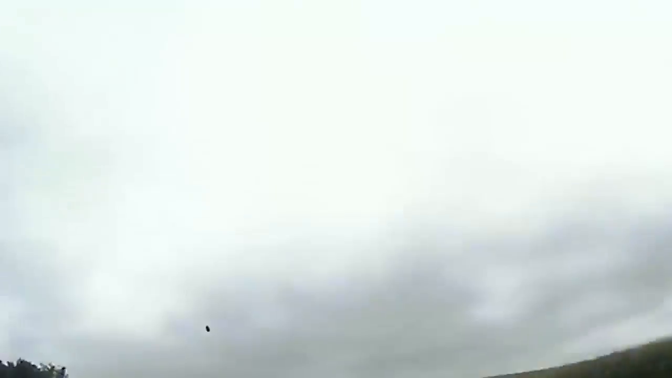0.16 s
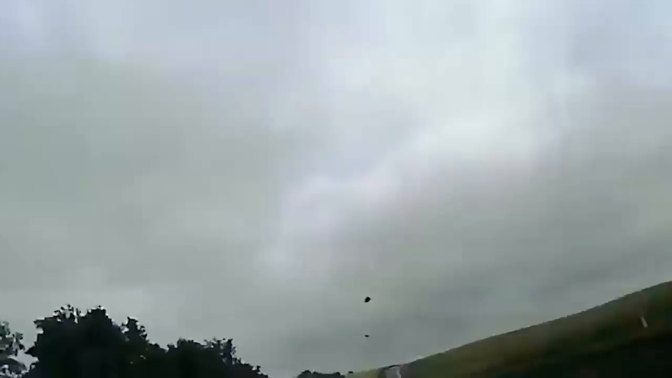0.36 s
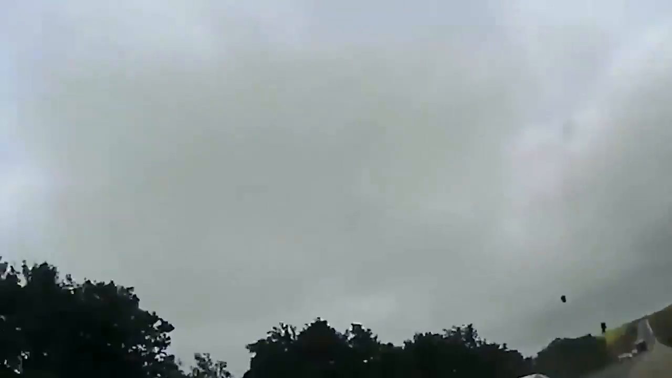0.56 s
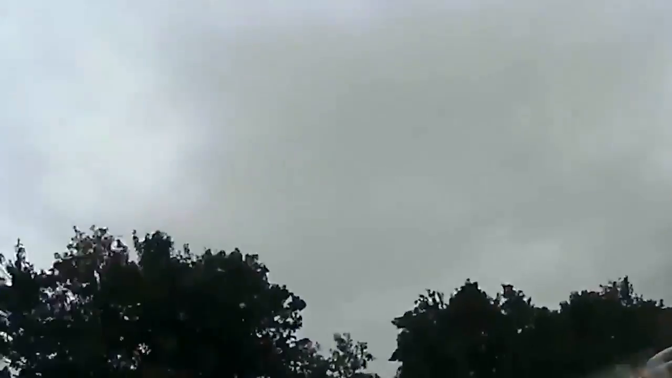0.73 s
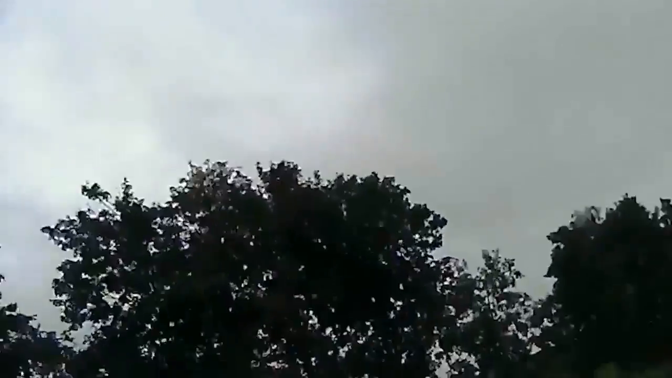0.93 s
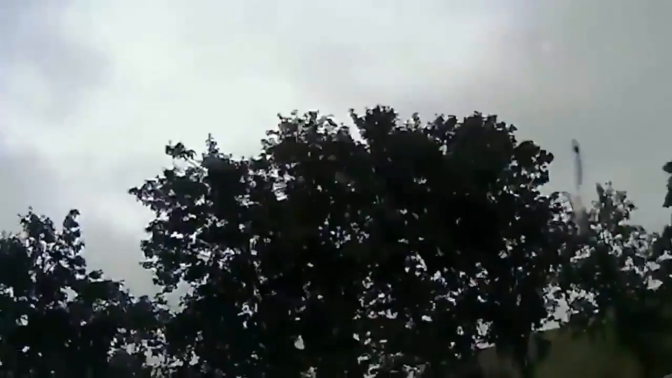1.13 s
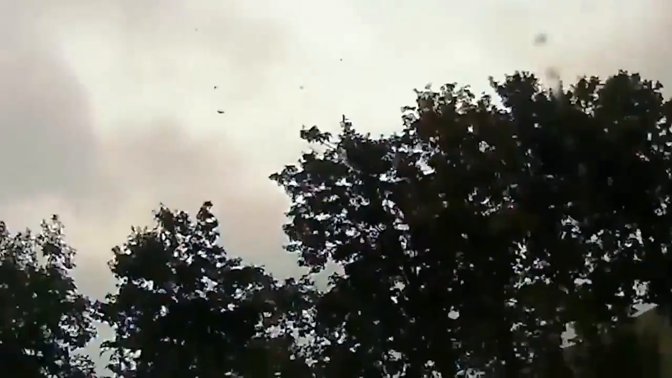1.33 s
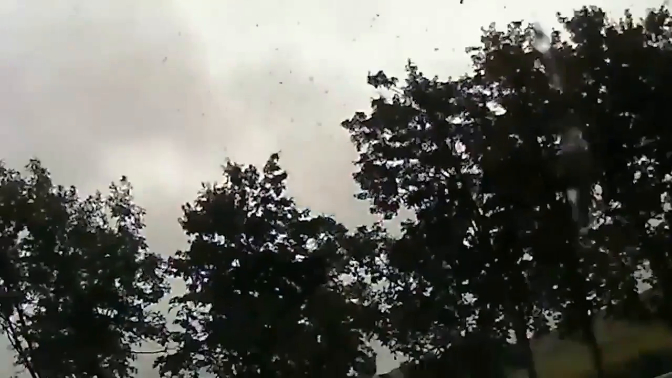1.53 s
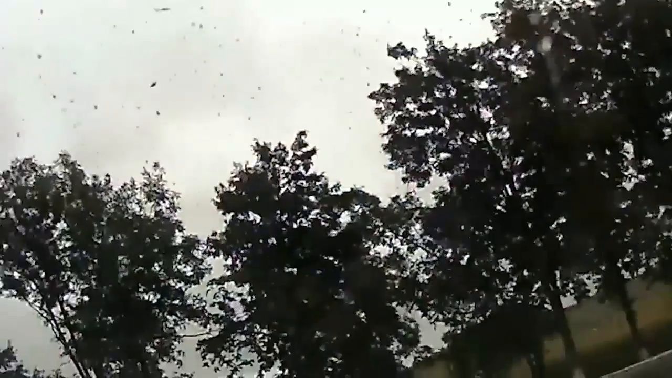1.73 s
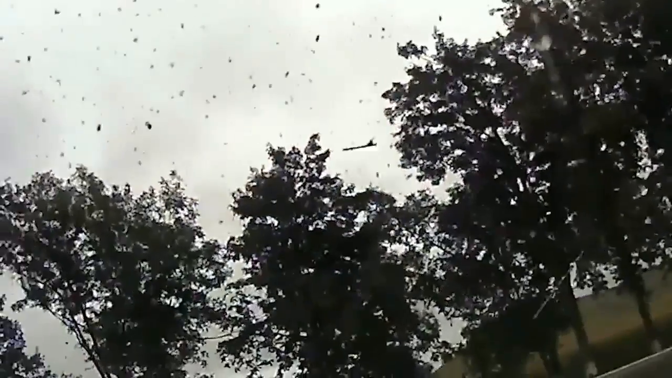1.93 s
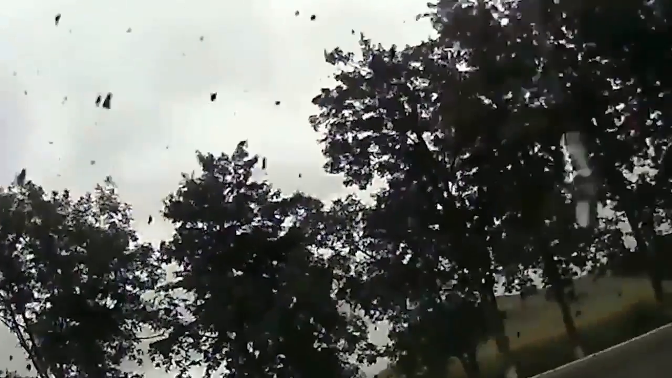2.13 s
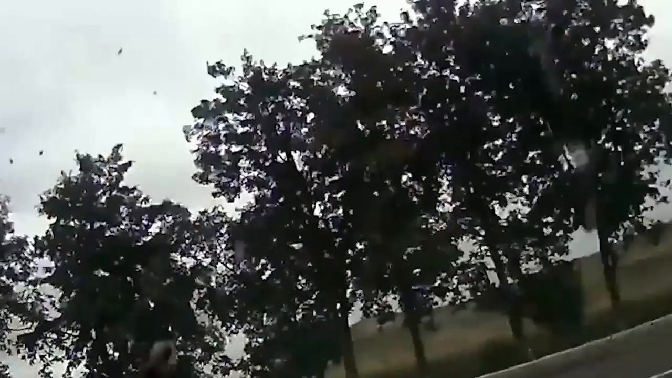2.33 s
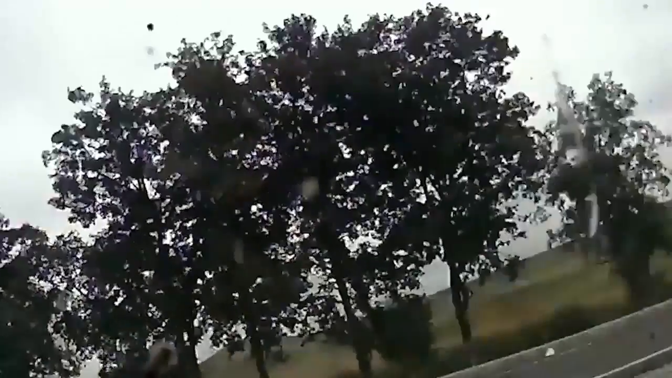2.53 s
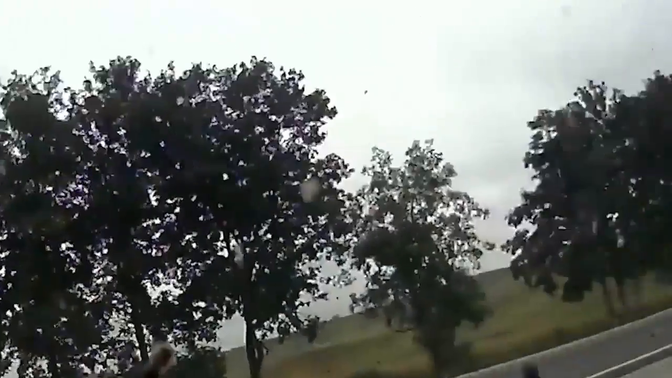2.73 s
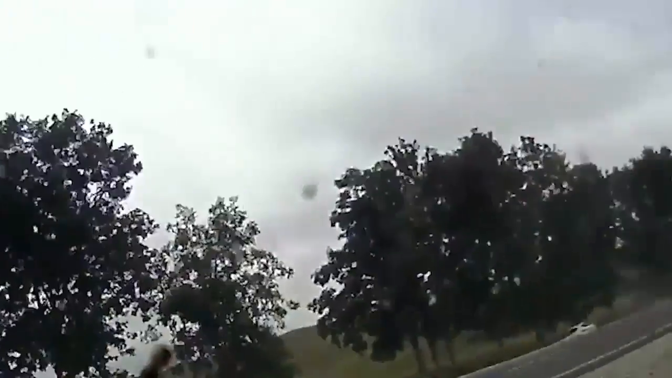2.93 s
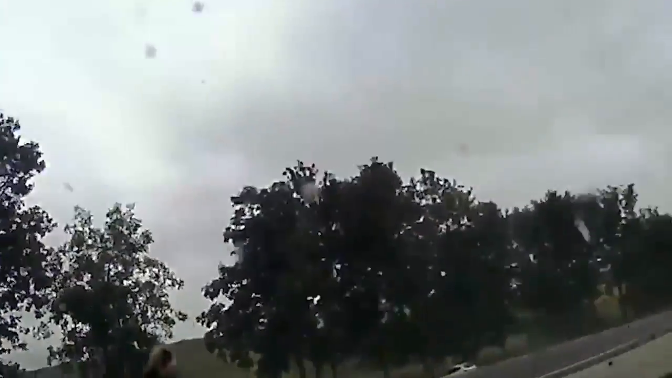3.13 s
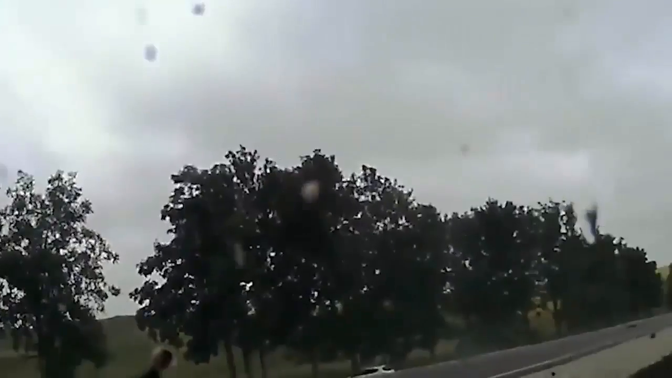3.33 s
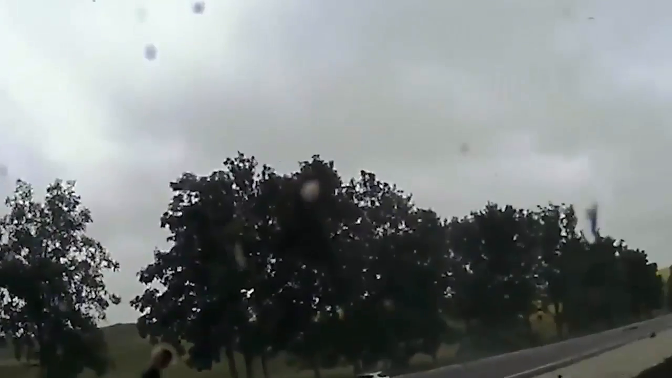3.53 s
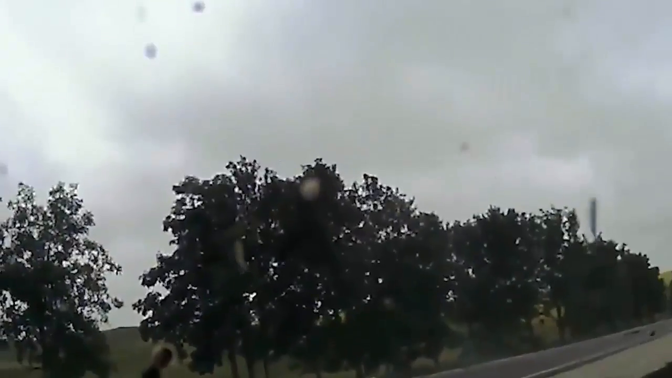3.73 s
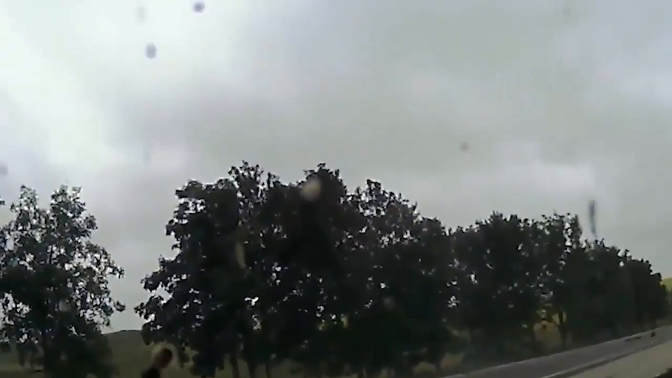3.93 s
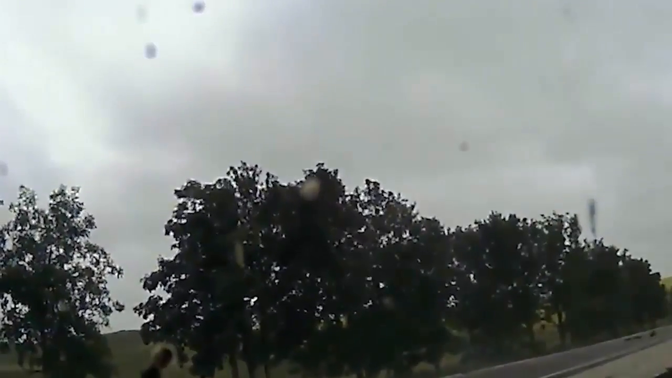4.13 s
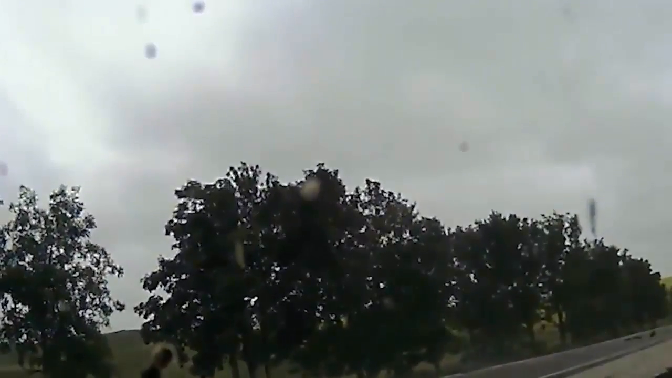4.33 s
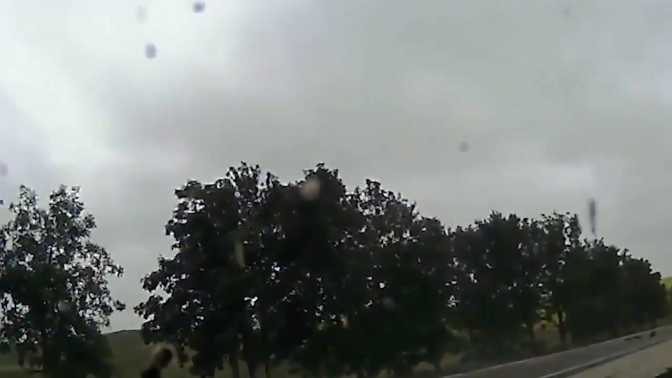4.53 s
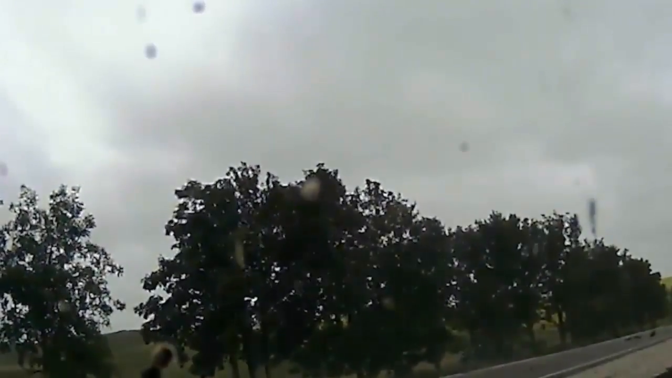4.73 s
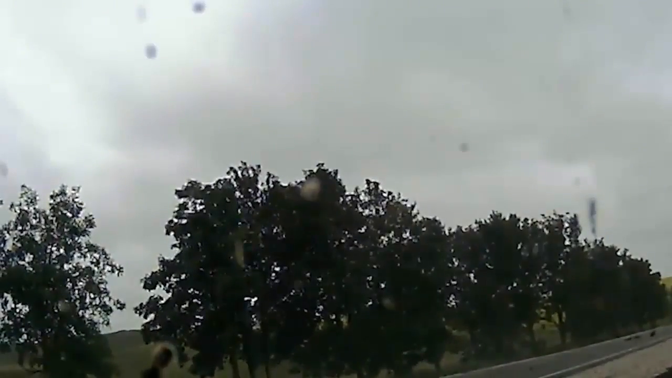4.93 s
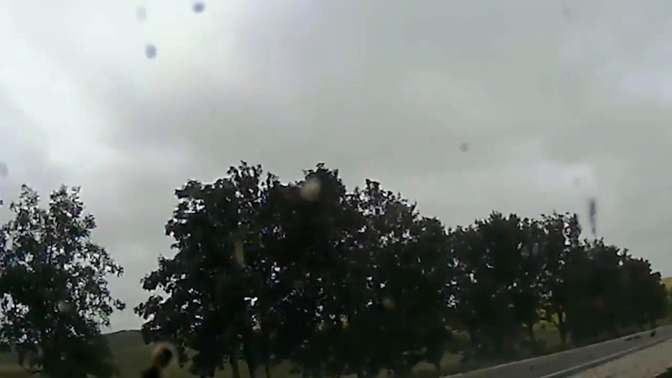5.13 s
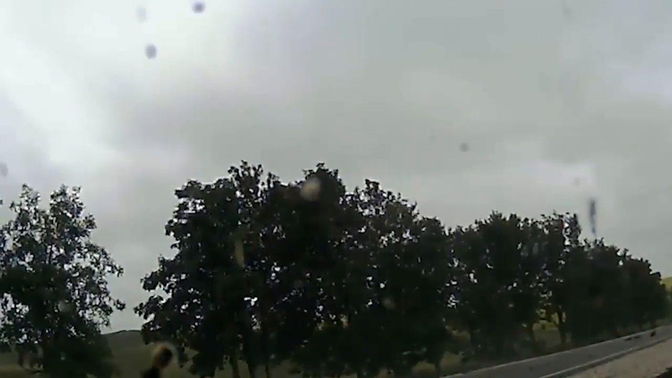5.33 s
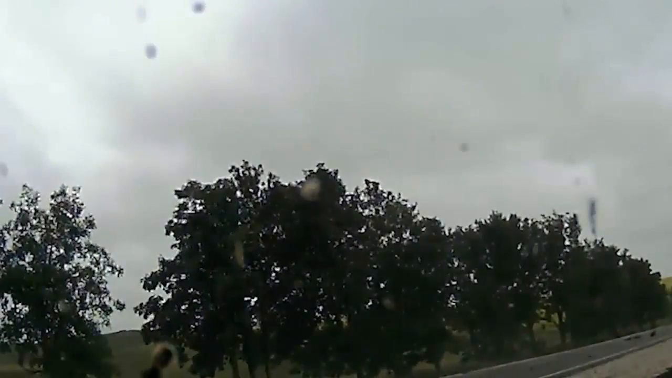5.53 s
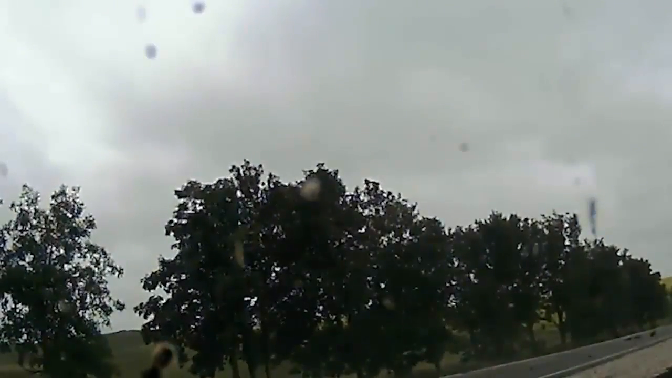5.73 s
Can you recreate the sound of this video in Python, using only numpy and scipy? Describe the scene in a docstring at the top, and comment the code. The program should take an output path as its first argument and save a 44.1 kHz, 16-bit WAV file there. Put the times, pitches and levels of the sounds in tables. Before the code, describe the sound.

The sound is heard from inside a car, close to the windscreen. Low road noise and a brief, high tyre squeal open the scene. At about 0.3 seconds a very loud collision overloads the microphone, with a deep boom, crumpling metal and sharp snaps of plastic and glass. From 0.5 seconds the car slides over the verge, rumbling and crunching through gravel while splinters crack and loose objects knock. Heavy thumps land around 1 and 1.3 seconds, and metal panels clank three times between 1.5 and 2.1 seconds. The slide fades steadily, with a softer thump near 3 seconds. From about 3.5 to 5 seconds dirt patters lightly onto the roof and glass in waves, among small ticks and knocks. A faint, low engine idle emerges and continues under a soft cabin hush. Grit trickles off, and a quick plastic double clack sounds near 5.7 seconds.

```python
"""A car crash, heard from inside at the windscreen. Tyres squeal by stick-slip friction, then the impact
drives a pressure surge through the cabin that overloads the microphone. The car slews over the verge:
its shell booms, metal and gravel crunch, and blows excite the damped modes of panels and plastic.
It comes to rest in a shower of dirt, the engine still idling as a series of low harmonics."""
import sys
import numpy as np
from scipy import signal
from scipy.fft import rfft, irfft
from scipy.io import wavfile
from scipy.ndimage import uniform_filter1d

SR = 44100
rng = np.random.default_rng(int(sys.argv[2]) if len(sys.argv) > 2 else 0)


def to_wav(s):
    """Save 16-bit WAV."""
    ch = np.atleast_2d(s).T  # columns
    pcm = np.round(np.clip(ch, -1, 1) * 32767)  # PCM
    wavfile.write(sys.argv[1], SR, pcm.astype(np.int16))


N = 254721
T = np.arange(N) / SR
IMPACT_S, LANDING_S = .32, 0.49  # the cars meet; this one drops onto the verge

# tyres biting the road: t/s, hold/s, level/dB
TYRE_BITES = [(.085, 0.17, -36), (.253, 0.026, -30)]
# spectra of cabin air, booming shell, heaving car, crunch, grit and falling dirt: f/Hz, level/dB
AIR_SPECTRUM = [(100, 0.5), (300, 3), (550, -2), (750, -21.5), (950, -9), (1500, -19), (2500, -22.5),
                (3400, -32), (4200, -22.5), (6000, -31), (9000, -40), (15000, -34)]
BOOM_SPECTRUM = [(8, -28), (22, 2), (38, 1.5), (70, -3), (130, -0.5), (200, -20), (400, -44), (1000, -108)]
HEAVE_SPECTRUM = [(10, -39.5), (25, -5), (40, -4.5), (60, -6), (110, -37), (400, -72)]
CRUNCH_SPECTRUM = [(60, -5.5), (170, 2), (400, 2.5), (800, -3), (1250, -12), (2000, -18), (3500, -27),
                   (7000, -36), (16000, -68)]
GRIT_SPECTRUM = [(800, -36), (2200, 4), (3600, -3.5), (4700, 6.5), (6500, -1), (9000, -5), (15000, -7.5)]
DIRT_SPECTRUM = [(100, -11.5), (300, -5.5), (600, 0.5), (1000, -5), (2000, -13.5), (3500, -15), (6000, -17),
                 (10000, -29.5), (15000, -29)]
# resonances of the car body: f/Hz, bandwidth/Hz, gain/dB
BODY_RESONANCES = [(397, 480, 2), (727, 31, 3.5), (965, 200, 4), (1470, 550, 5.5), (1737, 115, 4.5),
                   (2750, 620, 5), (4250, 330, 3)]
# plastic and glass snapping: t/s, relative level/dB, f/Hz
CRACKS = [(.155, -33.5, 3870), (.334, 2.5, 2950), (.3515, 1, 2540), (.375, -4, 3020), (.441, -26, 3240),
          (.49, -10.5, 3600), (.5945, -6, 3640), (.7328, -3.5, 3000), (.823, -14.5, 3120),
          (1.063, -6, 4120), (1.0904, -15.5, 4560), (1.164, -14, 2700), (1.2212, -16, 5400),
          (1.2486, -15, 4800), (1.308, -16, 4900), (1.3615, -13.5, 4540), (1.4087, -15.5, 3370),
          (1.479, -19, 4400), (1.5804, -16, 3440), (1.6621, -9, 4190), (1.8977, -24.5, 3900),
          (2.3124, -17.5, 5570), (2.3605, -30, 5900), (2.4417, -19, 2940), (2.611, -31.5, 3520),
          (2.69, -33, 4350), (2.8674, -19.5, 5370), (2.9295, -28, 5000), (2.9494, -35, 4550),
          (3.287, -37, 5160), (3.159, -39, 3000), (3.399, -31.5, 2230), (3.578, -28.5, 2960),
          (3.596, -28, 2880), (3.7544, -30.5, 7600), (4.0801, -27, 4430), (4.2837, -29.5, 2400),
          (4.4444, -31.5, 6100), (4.6017, -32, 7650), (5.0114, -41, 3070), (5.1706, -40.5, 4320),
          (5.661, -27.5, 3480)]
# suspension and cargo thumping: t/s, level/dB, f/Hz
THUMPS = [(.322, 2, 109), (1.045, -2.5, 141), (1.268, -4.5, 136), (3.059, -16, 135.5), (3.366, -28, 80.3),
          (4.798, -19, 258), (5.057, -20.5, 79.3), (5.182, -26, 213)]
# loose objects knocking: t/s, relative level/dB, f/Hz
KNOCKS = [(.3245, -15, 420), (.411, -23, 447), (.971, -5, 460), (1.036, -2, 508), (1.303, -7.5, 627),
          (1.451, -5.5, 418), (1.591, -9, 750), (1.631, -9.5, 520), (1.777, -31, 1000), (1.99, -24.5, 736),
          (2.016, -20, 750), (2.127, -7.5, 711), (2.2135, -4.5, 377), (2.2145, -8, 740),
          (2.261, -10.5, 667), (2.289, -16, 733), (2.387, -18.5, 414), (2.411, -19, 820),
          (2.49, -21.5, 366), (2.802, -23.5, 688), (3.12, -27, 288), (3.156, -26, 386),
          (3.212, -20.5, 1120), (3.2175, -14.5, 360), (3.219, -25, 1060), (3.372, -25.5, 316),
          (3.397, -23, 460), (3.468, -25, 334), (3.531, -27.5, 458), (3.731, -20.5, 414),
          (4.257, -26.5, 584), (4.504, -33, 1014), (4.647, -30, 917), (5.005, -33, 720),
          (5.169, -31.5, 360), (5.325, -39, 454)]
# pulses of cabin pressure: t/s, duration/s, relative pressure
PRESSURE_PULSES = [(0.328, 0.0035, 1), (0.331, 0.0088, -1.02), (0.338, 0.038, -0.89), (0.346, 0.14, -0.31),
                   (0.443, 0.032, -0.84), (.48, .018, 0.11)]
# the car heaving on its springs: t/s, hold/s, level/dB
HEAVES = [(.76, 0.11, -14.5), (1.45, 0.39, -22), (2.2, 0.52, -31), (3.04, .06, -33.5)]
# the car digging into the ground: t/s, hold/s, boom level/dB, crunch level/dB
JOLTS = [(.98, 0.24, -16.5, -18.5), (1.57, 0.034, -17.5, -31), (2.12, .17, -29.5, -32),
         (3.47, 0.04, -32.5, -48), (5.06, 0.089, -35, -55.5)]
# blows on a metal panel and on a hard plastic part: t/s, relative level/dB
PANEL_STRIKES = [(1.56, -7.5), (1.88, -6.5), (2.095, -0.5)]
PLASTIC_STRIKES = [(5.651, -19.5), (5.6605, -18.5)]
# their modes: f/Hz, level/dB, T60/s
PANEL_MODES = [(846, 2.5, 0.072), (953, -5, 0.019), (1080, 7, 0.016), (1444, 6.5, 0.015),
               (1700, -10, 0.083), (2790, -9, 0.03), (4300, -15, 0.041)]
PLASTIC_MODES = [(645, 4.5, 0.026), (1114, -7.5, 0.031), (1350, -10, 0.023), (1520, 1.5, .035),
                 (2150, -8, 0.04), (3100, -8, 0.03), (3800, -21, 0.21), (4930, -24, .05)]
# firing rate at idle: t/s, f/Hz
FIRING_RATE = [(4.1, 30.5), (4.342, 30.5), (4.95, 30), (5.238, 29), (5.75, 30.5)]
# harmonics of the firing rate: number, level/dB
ENGINE_HARMONICS = [(1, 10), (2, 7.5), (3, 4.5), (4, -23), (5, -13), (6, -33), (7, -44), (8, -21)]
# waves of dirt landing, and grit trickling off the car: t/s, hold/s, level/dB
DIRT_FALLS = [(3.5, 0.093, -44), (3.77, 0.068, -42), (4.04, 0.2, -43), (4.36, 0.029, -45),
              (4.59, 0.073, -45.5)]
TRICKLES = [(5.48, .3, -62), (5.66, 0.017, -50.5)]


def amp(db):
    """Amplitude ratio of a level in decibels."""
    return 10 ** (np.asarray(db) / 20)


def unit(x):
    """Normalisation to rms 1."""
    return x / np.sqrt(np.mean(x ** 2) + 1e-20)


def steady(x, window):
    """Normalisation to a running rms of 1 over a window of samples."""
    return x / np.sqrt(uniform_filter1d(x ** 2, size=window) + 1e-12)


def spectrum_db(spectrum, hz):
    """Interpolation of level on a logarithmic frequency axis."""
    f, db = np.transpose(spectrum)
    return np.interp(np.log(hz + 1), np.log(f), db)


def body_db(hz):
    """Resonance: each mode of the car body adds a bell-shaped peak in level."""
    return sum(db / (1 + (2 * (hz - f) / width) ** 2) for f, width, db in BODY_RESONANCES)


def shaped(x, db_of_hz, size=4096):
    """Causality: a minimum-phase filter rings only after it is excited."""
    gain_db = np.maximum(db_of_hz(np.fft.rfftfreq(size, 1 / SR)), -100)
    cepstrum = irfft(np.log(amp(gain_db)))
    cepstrum[1:size // 2] *= 2
    cepstrum[size // 2 + 1:] = 0
    return signal.oaconvolve(x, irfft(np.exp(rfft(cepstrum))))[:len(x)]


def soften(x, corner_hz):
    """Second-order low-pass: treble loss, as from absorption by upholstery."""
    return shaped(x, lambda hz: -10 * np.log10(1 + (hz / corner_hz) ** 4))


def wander(hz):
    """Random modulation of rms 1, band-limited to about hz."""
    f = np.fft.rfftfreq(32768, N / SR / 32768)
    slow = irfft(rfft(rng.standard_normal(32768)) / (1 + (f / hz) ** 4))
    return unit(np.interp(T, np.linspace(0, T[-1], len(slow)), slow))


def narrowband(phase, width_hz):
    """Random quadrature modulation spreads a tone into a band of noise."""
    return unit(wander(width_hz) * np.cos(phase) + wander(width_hz) * np.sin(phase))


def drone(spectrum):
    """Stationary noise of rms 1 with the given spectrum."""
    noise = shaped(rng.standard_normal(N), lambda hz: spectrum_db(spectrum, hz), size=16384)
    return steady(noise, window=4000)


def swell(start_s, rise_s, hold_s, fall_db_per_s):
    """Envelope with a linear rise, a hold and an exponential decay."""
    age = T - start_s
    return np.clip(age / rise_s, 0, 1) * amp(-fall_db_per_s * np.maximum(age - rise_s - hold_s, 0))


def power_sum(*gains):
    """Incoherent sources add in power."""
    return np.sqrt(sum(gain ** 2 for gain in gains))


def swells(rows, rise_s, fall_db_per_s, column=2):
    """Power sum of one swell a row, its level taken from the given column."""
    return power_sum(*(amp(row[column]) * swell(row[0], rise_s, row[1], fall_db_per_s) for row in rows))


def add(mix, s, sound):
    """Superposition of a sound on the mix at time s."""
    part = mix[max(round(s * SR), 0):][:len(sound)]
    part += sound[:len(part)]


def tyres(first_hz=1062, last_hz=988, sag_s=.1, jitter=0.039):
    """Stick-slip friction: one tread squeals, sagging as it slows; another scrubs a little higher."""
    pitch = last_hz + (first_hz - last_hz) * np.exp(-T / sag_s)
    phase = 2 * np.pi * np.cumsum(pitch * (1 + jitter * wander(hz=215))) / SR
    tone = np.sin(phase) + amp(-16) * np.sin(2 * phase) + amp(-26) * np.sin(3 * phase)
    bites = swells(TYRE_BITES, rise_s=0.0055, fall_db_per_s=300)
    squeal = unit(tone) * bites * amp(4.5 * wander(hz=110))
    scrub = amp(-38 - 7 * T / IMPACT_S) * narrowband(1.1 * phase, width_hz=220)
    return squeal + scrub * (T < IMPACT_S)


def cabin_air():
    """Noise floor: the steady, broadband hush of the cabin."""
    return amp(-51) * drone(AIR_SPECTRUM)


def whine(pitch_hz=4040):
    """Narrow-band noise, heard as a faint whistle that wavers in level."""
    return narrowband(2 * np.pi * pitch_hz * T, width_hz=60) * amp(-72 + 3 * wander(hz=3))


def crash_envelope(road_db, impact_db, slide_db, hold_s, fall_db_per_s):
    """Dissipation of motion: road noise, a short crush, then a slide that fades as the car slows."""
    crush_rise_s = 0.022
    road = amp(road_db) * (T < IMPACT_S + crush_rise_s)
    crush = amp(impact_db) * swell(IMPACT_S, crush_rise_s, hold_s=0.1, fall_db_per_s=130)
    slide = amp(slide_db) * swell(LANDING_S, 0.065, hold_s, fall_db_per_s)
    return power_sum(road, crush, slide)


def jolts(column):
    """Transient envelopes: each jolt bites quickly and lets go."""
    return swells(JOLTS, rise_s=0.011, fall_db_per_s=108, column=column)


def rumble(rest_db=-50):
    """Forced vibration: rough ground makes the shell boom and the car heave on its springs."""
    ploughing = crash_envelope(road_db=-32.5, impact_db=-8, slide_db=-12.5,
                               hold_s=0.23, fall_db_per_s=10.5)
    boom = drone(BOOM_SPECTRUM) * power_sum(ploughing, jolts(column=2), amp(rest_db))
    heave = drone(HEAVE_SPECTRUM) * swells(HEAVES, rise_s=0.043, fall_db_per_s=48)
    return boom + heave


def grains(per_s, spread_db):
    """Poisson impulses, mostly small with a few large ones."""
    size = amp(spread_db * np.minimum(rng.exponential(1, N), 4))
    return unit(size * rng.choice([-1, 1], N) * (rng.random(N) < per_s / SR))


def particles(spectrum, low_hz, high_hz, per_s, spread_db, clump_db, wash, bands):
    """Shot noise: each size of piece strikes in clumps and excites its own band, over a wash of echoes."""
    out, centres = np.zeros(N), np.log2(np.geomspace(low_hz, high_hz, bands))
    gusts = wander(hz=26)
    for share in np.eye(bands):
        clumps = amp(clump_db * (gusts + wander(hz=41.8)))
        strikes = unit((grains(per_s, spread_db) + wash * rng.standard_normal(N)) * clumps)
        band_db = lambda hz: 10 * np.log10(np.interp(np.log2(hz + 1), centres, share) + 1e-4)
        out += shaped(strikes, lambda hz: spectrum_db(spectrum, hz) + body_db(hz) + band_db(hz))
    return steady(out, window=8000)


def crunch(settling_db=-56):
    """Coarse shot noise and its envelope: metal crumples, gravel churns, clods land, the wreck settles."""
    sliding = crash_envelope(road_db=-37, impact_db=-6.5, slide_db=-8, hold_s=0.051, fall_db_per_s=15)
    clods = amp(-41.5) * swell(start_s=3.405, rise_s=0.25, hold_s=0.3, fall_db_per_s=24)
    envelope = power_sum(sliding, jolts(column=3), clods, amp(settling_db))
    noise = particles(CRUNCH_SPECTRUM, 250, 2943, per_s=900, spread_db=3, clump_db=2, wash=0.67, bands=6)
    return noise * envelope, envelope


def grit(sifting_db=-72):
    """Fine shot noise and its envelope: splinters spray, then sand rains down and trickles off."""
    spray = crash_envelope(road_db=-66, impact_db=-23, slide_db=-30.5, hold_s=0.027, fall_db_per_s=12)
    sand = amp(-55) * swell(start_s=3.31, rise_s=0.46, hold_s=0.3, fall_db_per_s=15.5)
    trickles = swells(TRICKLES, rise_s=0.015, fall_db_per_s=120)
    envelope = power_sum(spray, sand, amp(sifting_db), trickles)
    noise = particles(GRIT_SPECTRUM, 2190, 13400, per_s=1000, spread_db=6.5, clump_db=2.96,
                      wash=2.9, bands=4)
    return noise * envelope, envelope


def strays(envelope, above_db, pitch_hz, octaves, count, until_s=4.6):
    """Random impacts of loose pieces, in proportion to an envelope: rows of t/s, level/dB, f/Hz."""
    when, size, tone = rng.random((count, 3)).T
    times = IMPACT_S + (until_s - IMPACT_S) * (np.arange(count) + when) / count
    levels = above_db + 20 * np.log10((.5 + size) * np.interp(times, T, envelope) + 1e-9)
    return zip(times, levels, pitch_hz * 2 ** (octaves * (tone - .5)))


def blows(rows, t60_at_1khz_s, slopes_db_per_octave, knee_octaves, rise_s, tail_db, tail_t60_s, ring):
    """Damped transients: a noise burst and a tone, longer when deep, with a reverberant tail."""
    out, t = np.zeros(N), T[:SR // 3]
    for s, db, pitch in rows:
        t60 = t60_at_1khz_s * np.sqrt(1000 / pitch)
        decay = amp(-60 * t / t60) + amp(tail_db - 60 * t / tail_t60_s)
        burst = (1 - np.exp(-t / rise_s)) * decay

        def peak_db(hz):
            octaves = np.log2((hz + 1) / pitch)
            slope = np.where(octaves < 0, *slopes_db_per_octave)  # below and above the pitch
            return body_db(hz) - slope * (np.hypot(octaves, knee_octaves) - knee_octaves)
        fracture = unit(shaped(burst * rng.standard_normal(len(t)), peak_db))
        tone = unit(burst * np.sin(2 * np.pi * pitch * t))
        add(out, s, amp(db) * unit(fracture + ring * tone) * np.std(burst) / burst.max())
    return out


def cracks(grit_envelope):
    """Brittle fracture: plastic and glass snap in sudden, bright bursts."""
    rows = [*CRACKS, *strays(grit_envelope, above_db=16.5, pitch_hz=4140, octaves=1.2, count=11)]
    snaps = blows(rows, t60_at_1khz_s=.083, slopes_db_per_octave=(8, 8), knee_octaves=0.15,
                  rise_s=0.00018, tail_db=-30, tail_t60_s=0.12, ring=0.33)
    return amp(-8) * soften(snaps, corner_hz=11500)


def tearing(depth_db=5, fade_s=0.15):
    """Amplitude modulation: sheet metal yields in rapid jerks, hardest just after the cars meet."""
    depth = depth_db * np.exp(-np.maximum(T - IMPACT_S, 0) / fade_s) * (T > IMPACT_S)
    return amp(depth * wander(hz=130))


def thumps(rise_s=0.011, cycles=16):
    """Damped oscillation: suspension and cargo swing, each losing 60 dB in the same number of cycles."""
    out, t = np.zeros(N), T[:SR // 3]
    for s, db, hz in THUMPS:
        envelope = amp(db - 60 * t * hz / cycles) * (1 - np.exp(-t / rise_s))
        add(out, s, envelope * np.sin(2 * np.pi * hz * t))
    return out


def knocks(crunch_envelope):
    """Impact excitation: loose objects knock about and ring briefly in the midrange."""
    rows = [*KNOCKS, *strays(crunch_envelope, above_db=5.5, pitch_hz=545, octaves=1.8, count=10)]
    impacts = blows(rows, t60_at_1khz_s=0.054, slopes_db_per_octave=(2.5, 12.5), knee_octaves=0.11,
                    rise_s=0.0013, tail_db=-16, tail_t60_s=0.24, ring=0.51)
    return amp(-5.5) * soften(impacts, corner_hz=7500)


def pressure_surge():
    """Compression and rarefaction: the shell, struck and springing back, shoves the cabin air."""
    return sum(pressure * np.sin(np.pi * np.clip((T - s) / length, 0, 1))
               for s, length, pressure in PRESSURE_PULSES)


def struck(rows, modes, chatter, chatter_s, click, detune):
    """Modal vibration: a blow and its brief contact chatter set an object's modes ringing."""
    out, t = np.zeros(N), T[:SR // 4]
    for s, db in rows:
        ring = np.zeros(len(t))
        for hz, level, t60 in modes:
            detuned_hz = hz * (1 + detune * rng.standard_normal())
            ring += amp(level - 60 * t / t60) * np.sin(2 * np.pi * detuned_hz * t)
        contact = rng.standard_normal(len(t)) * np.exp(-t / chatter_s)
        hit = ring + chatter * signal.fftconvolve(ring, contact / np.linalg.norm(contact))[:len(t)]
        add(out, s, amp(db) * (hit / abs(hit).max() + click * contact))
    return soften(out, corner_hz=7500)


def panel_clanks():
    """Inharmonic modes of a struck sheet-metal panel."""
    return amp(-0.5) * struck(PANEL_STRIKES, PANEL_MODES, chatter=1, chatter_s=0.013,
                              click=0.007, detune=0.019)


def engine(level_db=-37, start_s=3, rise_s=1.33):
    """Periodic excitation: slightly uneven firings form harmonics that emerge as the car stops."""
    firing_hz = np.interp(T, *np.transpose(FIRING_RATE)) * (1 + 0.01 * wander(hz=3.7))
    phase = 2 * np.pi * np.cumsum(firing_hz) / SR
    hum = sum(-amp(db - 1.5 * wander(hz=1)) * np.cos(k * phase) for k, db in ENGINE_HARMONICS)
    return unit(hum) * amp(level_db) * np.clip((T - start_s) / rise_s, 0, 1)


def dirt_shower():
    """Shot noise in waves: thrown dirt falls back on roof and glass."""
    noise = particles(DIRT_SPECTRUM, 356, 10500, per_s=960, spread_db=2.5, clump_db=3.5,
                      wash=1.3, bands=9)
    return noise * swells(DIRT_FALLS, rise_s=0.016, fall_db_per_s=73)


def plastic_clacks():
    """Damped modes of a hard plastic part, struck twice in quick succession."""
    return amp(-1) * struck(PLASTIC_STRIKES, PLASTIC_MODES, chatter=0.95, chatter_s=0.0037,
                            click=0.04, detune=0.0076)


def scene():
    """Linear superposition of all sources at the windscreen."""
    coarse, crunch_envelope = crunch()
    fine, grit_envelope = grit()
    dirt = dirt_shower()
    background = engine() + whine() + cabin_air()
    crash = tyres() + pressure_surge() + rumble() + (coarse + fine) * tearing()
    hits = cracks(grit_envelope) + thumps() + knocks(crunch_envelope) + panel_clanks() + plastic_clacks()
    return (crash + hits + dirt + background)[None]


def saturate(x, limit, order):
    """Saturation: a rounded knee into a flat top, sharper at a higher even order."""
    return x / (1 + (x / limit) ** order) ** (1 / order)


def record(dry, leak_hz=6, droop_hz=14500, band_limit_hz=15100):
    """Overload: the microphone clips, its AC coupling lets the flat tops sag, the converter clips again."""
    microphone = saturate(dry[0], limit=0.5, order=6)
    coupled = signal.lfilter(*signal.butter(1, leak_hz, "high", fs=SR), microphone)
    converted = soften(saturate(coupled, limit=0.39, order=16), droop_hz)
    low_pass = signal.firwin(161, band_limit_hz, window=("kaiser", 9), fs=SR)
    return signal.oaconvolve(converted, low_pass, "same")[None]


dry = scene()
out = record(dry)
to_wav(out)
```